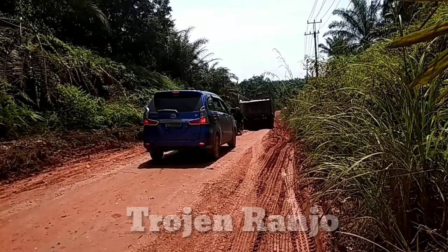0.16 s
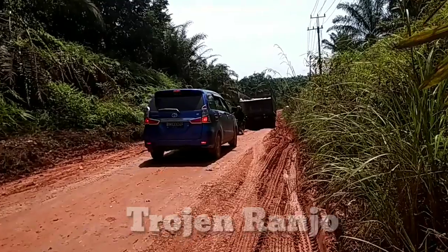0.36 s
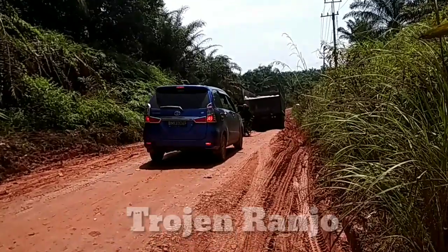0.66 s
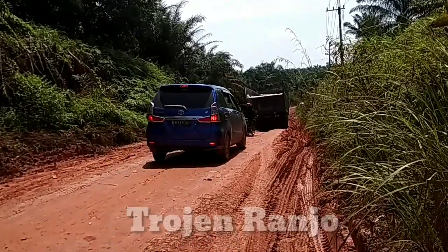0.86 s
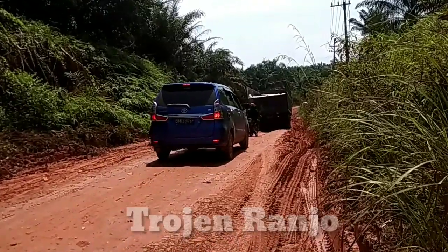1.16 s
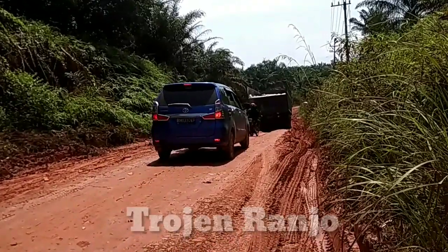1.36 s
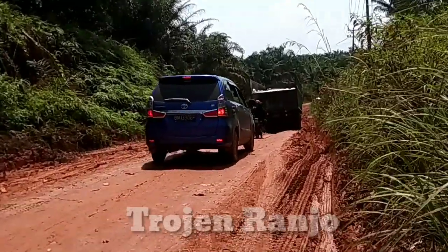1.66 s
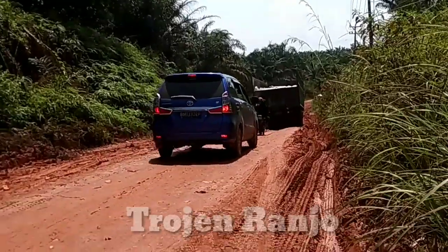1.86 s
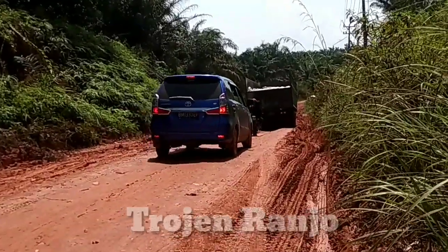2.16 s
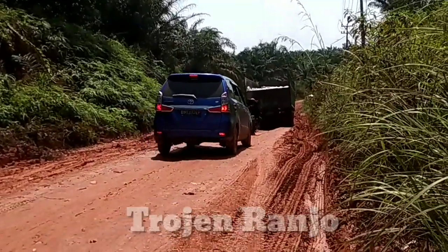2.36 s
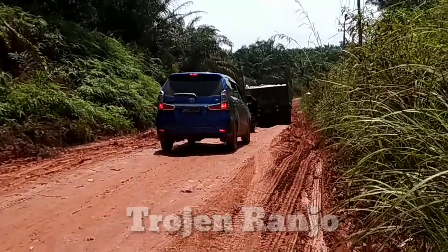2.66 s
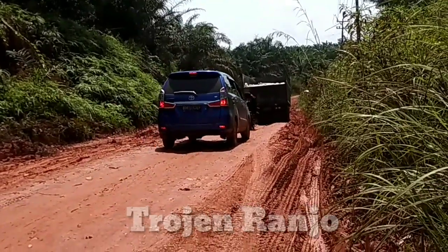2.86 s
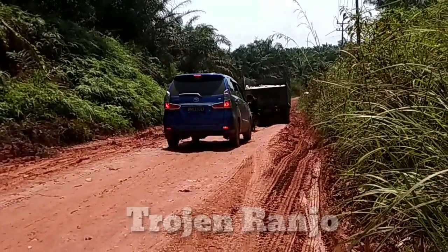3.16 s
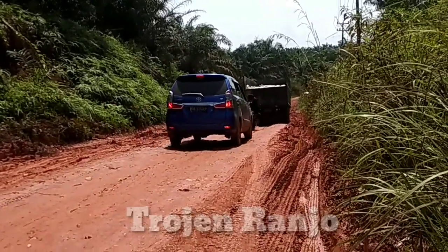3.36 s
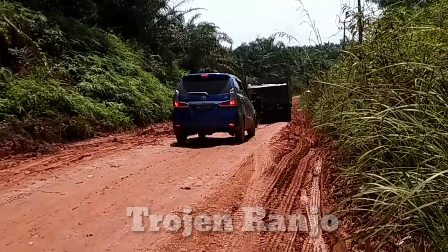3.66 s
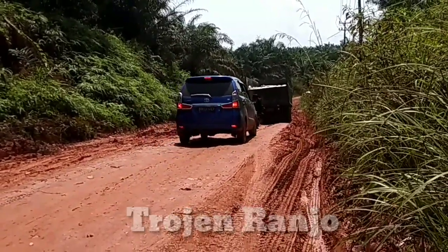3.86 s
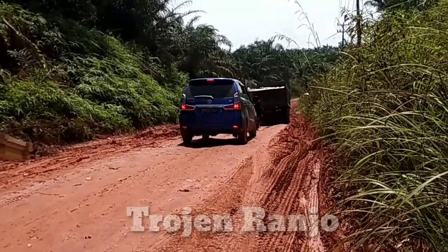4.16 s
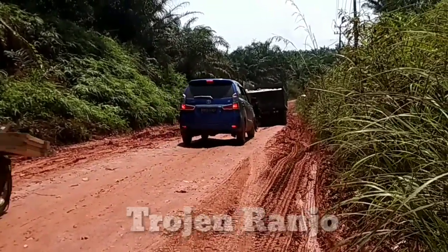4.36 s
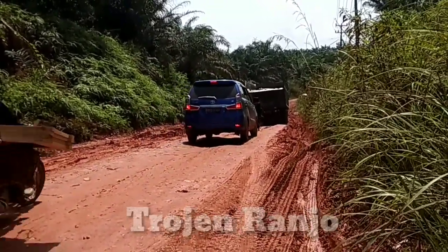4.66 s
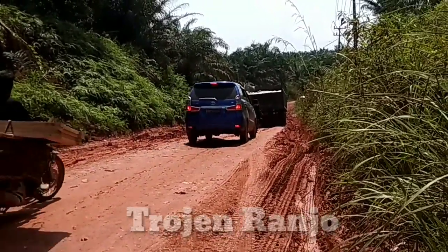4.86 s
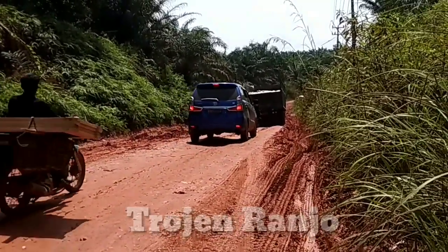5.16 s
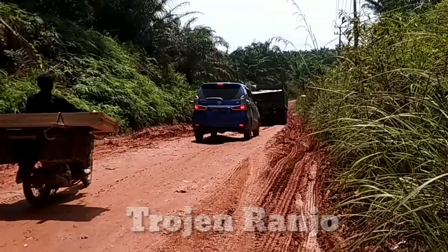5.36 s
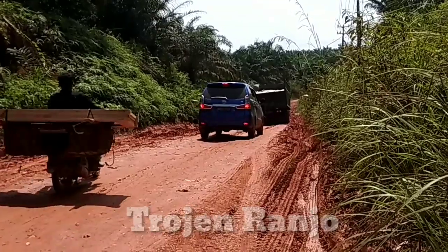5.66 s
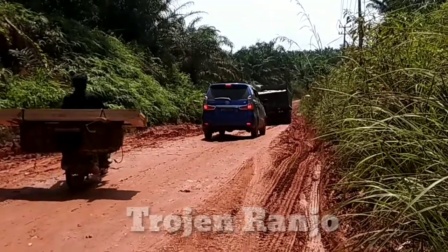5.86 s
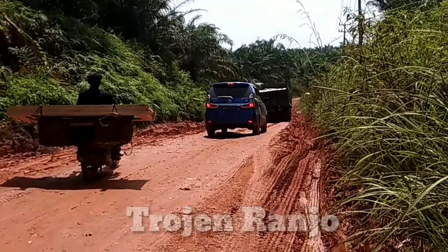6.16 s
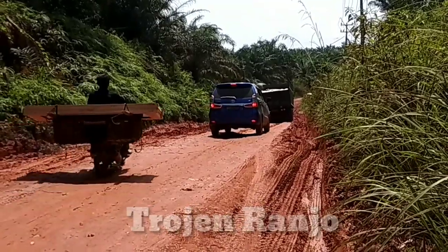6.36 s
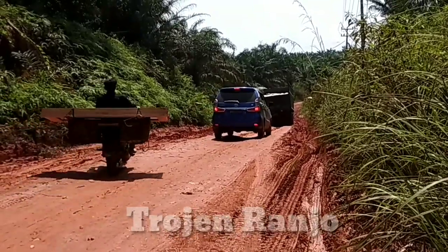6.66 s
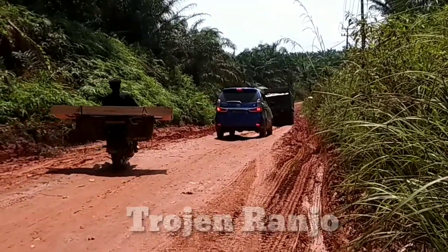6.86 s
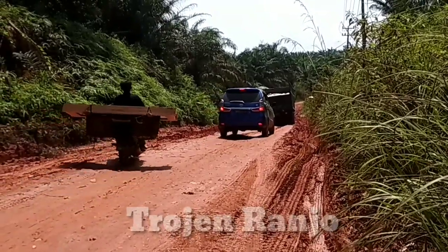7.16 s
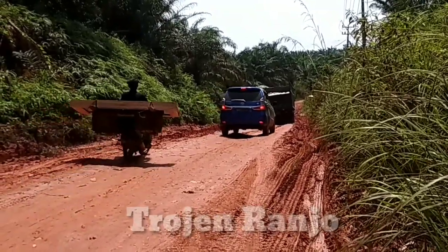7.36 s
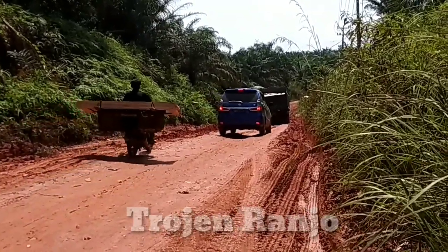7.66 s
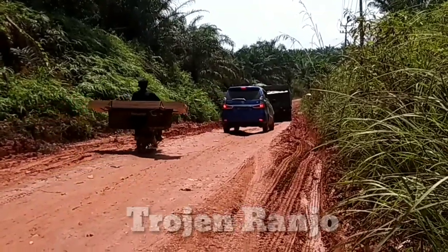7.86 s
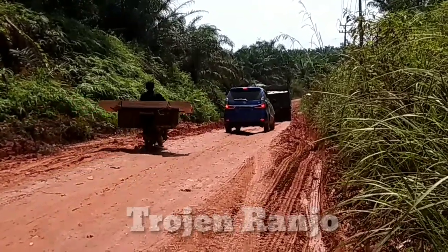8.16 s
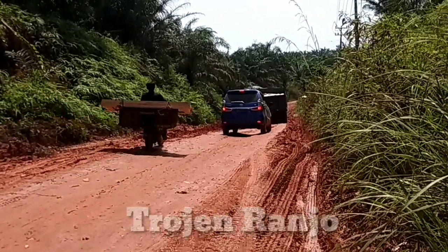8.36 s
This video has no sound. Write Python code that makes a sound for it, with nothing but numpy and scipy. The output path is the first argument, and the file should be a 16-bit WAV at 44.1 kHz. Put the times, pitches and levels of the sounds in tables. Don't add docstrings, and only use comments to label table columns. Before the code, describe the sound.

Open dirt road, heard from the roadside in stereo. From 0 s a loaded single-cylinder motorbike is already close at one side, its low uneven chug slowing from about 18 to 13 firings a second. Loose metal and boards jingle and clatter in irregular bursts, with tiny squeaks. The strongest jolt, at 1.6 s, adds a deep frame knock and sharp rattle. Revs rise slightly near 2.9 s, then one short throttle blip peaks at 4.0 s and drops in pitch as it shuts. A bracket rings around 4.3-5 s. From 4.4 s the bike moves toward the front and recedes, chain whirring near 5.5 s, putting slowly with thinner, softer rattles until 8.5 s. Throughout, a truck idles as a low steady hum near 48 Hz, with faint car hum and tyre rumble. Light wind thuds brush the right side at the start and around 7-8 s.

```python
import sys
import numpy as np
from scipy import signal
from scipy.fft import rfft, irfft, next_fast_len
from scipy.io import wavfile
from scipy.ndimage import uniform_filter1d, map_coordinates

SR = 44100
rng = np.random.default_rng(int(sys.argv[2]) if len(sys.argv) > 2 else 0)


def gain_from_db(level_db):
    decades = np.asarray(level_db, float) / 20
    return 10 ** decades


def unload_audio(sound):
    columns = np.transpose(np.atleast_2d(sound))
    steps = np.round(np.clip(columns, -1, 1) * 32767)
    wavfile.write(sys.argv[1], SR, steps.astype(np.int16))


N = 375291
IDLE_PER_S = 11.4

# time_s, firings_per_s
ENGINE_SPEED = [(0.0, 18.64), (0.191, 15.98), (0.903, 13.89), (1.064, 12.21), (1.324, 13.01),
                (1.444, 12.86), (1.848, 13.03), (2.609, 13.12), (2.842, 14.96), (2.942, 17.48),
                (3.225, 15.85), (3.831, 16.38), (4.045, 22.71), (4.27, 16.43), (4.731, 12.58),
                (6.048, 12.37), (7.326, 12.08), (8.52, 11.77)]
# time_s, left_port_lag_ms, side_shading_share [0-1]
BIKE_BEARING = [(0, 0.33, 0), (.75, 0.38, 0.33), (1.6, 0.45, 0.34), (2.5, 0.4, 0.96), (3.25, 0.29, 0.8),
                (4, 0.19, 0.51), (5, 0.15, 0.53), (6, 0.11, 0.55), (7, 0.1, 0.66), (8.51, 0.066, 0.55)]
# time_s, level_db
NEARNESS = [
    (0, -0.5),
    (1.5, 1.5),
    (2.9, 0.5),
    (4, -1),
    (4.4, -4),
    (5.6, -6.5),
    (7.4, -10),
    (8.51, -9.5),
]


def evened(x):
    return x / np.sqrt(np.mean(x ** 2) + 1e-20)


def curves(rows):
    s, *columns = np.transpose(rows)
    return [np.interp(np.arange(N) / SR, s, c) for c in columns]


def shaped(x, points, scale=gain_from_db):
    size = next_fast_len(N)
    hz, value = np.transpose(points)
    log_hz = np.log(np.fft.rfftfreq(size, 1 / SR) + 1)
    gain = scale(np.interp(log_hz, np.log(hz), value))
    return irfft(rfft(x, size) * gain, size)[..., :N]


def modes(x, table, wander_db=0.):
    out = 0
    for k, (hz, width_hz, db) in enumerate(table):
        level = gain_from_db(db + wander_db * drift(9)) if wander_db else gain_from_db(db)
        b, a = signal.iirpeak(hz, hz / width_hz, SR)
        out = out + (-1) ** k * level * signal.lfilter(b, a, x)
    return out


def gliding(x, hz, width_hz):
    turn = np.exp(2j * np.pi * np.cumsum(hz) / SR)
    r = np.exp(-np.pi * width_hz / SR)
    return 2 * (turn * signal.lfilter([1 - r], [1, -r], x / turn)).real


def drift(hz):
    knots = rng.standard_normal(int(N / SR * hz) + 3)
    coarse = np.arange(0, N + 64, 64)
    smooth = map_coordinates(knots, [coarse / SR * hz])
    return evened(np.interp(np.arange(N), coarse, smooth))


def grit(spread_db, size):
    clumps = np.repeat(rng.exponential(1, N // size + 1), size)[:N]
    return evened(rng.standard_normal((2, N)) * gain_from_db(spread_db * clumps))


def patchy(x, depth_db):
    z = signal.stft(x, nperseg=512, noverlap=384)[2]
    field = uniform_filter1d(rng.standard_normal(z.shape[1:]), size=3, axis=0)
    field = uniform_filter1d(field, size=20, axis=1)
    return signal.istft(z * gain_from_db(depth_db * evened(field)), nperseg=512, noverlap=384)[1][:, :N]


def exhaust():
    # time_s, thump_db
    throttle = [(0, -27), (.25, -30), (.6, -32), (1, -33.5), (1.3, -28), (1.6, -33.5), (2, -27),
                (3.2, -28.5), (3.5, -33.5), (3.62, -21), (3.83, -24), (3.95, -17.5), (4.1, -26),
                (4.55, -26), (4.75, -44.5), (5.4, -29.5), (6.3, -38), (8.52, -37)]
    # time_s, level_db (against an even one)
    kicks = [(.14, -3.5), (.386, 5), (.466, 0), (.596, 4.5), (.2, 4.5), (.8, 1), (1.029, -1), (1.182, 6),
             (1.8, 5), (1.875, 1.5), (1.955, -7), (2.34, 0.5), (2.42, -1.5), (2.49, -0.5), (2.712, -0.5),
             (2.795, -3), (2.86, -1), (2.92, 2.5), (3.09, 4), (3.15, -5), (3.276, 4), (3.34, -4),
             (3.467, 6), (3.654, 0), (4.24, -1.5), (4.495, -6), (4.565, -1), (5.03, 4), (5.13, -11),
             (5.195, 3), (5.51, -4), (5.68, -4), (5.92, -16), (6.16, 5.5), (6.24, -10), (6.57, 5),
             (6.65, -13), (6.735, 5.5), (6.895, 8), (6.98, -4), (7.135, -5), (7.305, 5.5), (7.39, -1),
             (7.48, 6.5), (7.56, -8), (7.64, 4), (7.8, 2), (7.89, -1), (7.975, 7.5), (8.06, -2), (8.145, 2),
             (8.225, -14), (8.395, -4), (8.475, 4)]
    # pitch_hz, width_hz, level_db
    pipe = [(197, 80, -17.5), (297, 17, -20.5), (324, 40, -20), (530, 40, -34)]
    uneven_db, push_ms, lead_ms, first_turn = 3.0, 3.57, 8.55, .47
    muffler_hz, shut_hz, shut_s, reopen_s = 113.5, 88, 4.02, 4.3
    upper_width_hz, boom_hz, boom_width_hz = 51.6, 61, 23.4
    coasting_per_s2 = -9
    per_s, near_db, t = curves(ENGINE_SPEED)[0], curves(NEARNESS)[0], np.arange(N) / SR

    shut = (t > shut_s) * np.clip(1 - ((t - shut_s) / (reopen_s - shut_s)) ** 3, 0, 1)
    upper_hz = muffler_hz + (shut_hz - muffler_hz) * shut
    pulling = uniform_filter1d(1. * (np.gradient(per_s) * SR > coasting_per_s2), size=3000)
    boom_db = 4 - 1.5 * pulling * (per_s - IDLE_PER_S) + 0.41 * near_db

    turns = first_turn + np.cumsum(per_s) / SR + per_s * lead_ms / 1000
    firing = turns.astype(int)
    fired = np.diff(np.floor(turns), prepend=0) > 0
    lean = np.clip((17 - per_s) / 4, .25, 1)
    firing_db = rng.uniform(-0.7, 1, 400) - 0.31 * (-1.) ** np.arange(400)
    kick_db = np.zeros(400)
    for s, db in kicks:
        kick_db[int(turns[round(s * SR)])] = db
    strength = gain_from_db(uneven_db * lean * firing_db[firing] + kick_db[firing])
    u = np.arange(2000) / SR * 1000 / push_ms
    push = signal.oaconvolve(fired * strength, u * np.exp(-u * u))[:N]

    upper = gliding(push, upper_hz, 1.36 * upper_width_hz)
    upper = gliding(upper, upper_hz, upper_width_hz)
    boom = modes(push, [(boom_hz, boom_width_hz, 0)])
    boom = modes(boom, [(boom_hz, 2 * boom_width_hz, 0)])
    push = evened(push)
    rung = evened(upper) + gain_from_db(boom_db) * evened(boom) + 0.24 * push + 8 * modes(push, pipe)
    return gain_from_db(curves(throttle)[0] - 7.5) * rung, turns % 1


def case_clatter(cycle):
    # pitch_hz, level_db_per_hz
    case = [(300, -13), (600, -2), (820, -8), (920, -8), (1000, 1.5), (1090, -4), (1550, -3.5), (2300, -7),
            (3500, -8), (8000, -26)]
    # time_s, level_db (against the clatter)
    chain = [
        (0, -10.5),
        (2.2, -13),
        (4.2, -12),
        (4.6, -7.5),
        (5.5, -3),
        (6.6, -13),
        (7, -17),
        (8.51, -12),
    ]
    per_s = curves(ENGINE_SPEED)[0]
    puffs = 1 + 0.065 * np.exp(-cycle / 0.19)
    shake = puffs * grit(1.0, size=64)
    whirr = evened(modes(shake, [(890, 48, 0.33), (990, 70, -0.33)], wander_db=1.5))
    level_db = -49.5 + curves(NEARNESS)[0] + 0.41 * (per_s - IDLE_PER_S)
    return gain_from_db(level_db) * (evened(shaped(shake, case)) + gain_from_db(curves(chain)[0]) * whirr)


def load():
    # start_s, peak_db, boards_share_db, hold_s, t60_s
    bumps = [(0.032, -39.5, -6, .01, 0.95), (0.173, -35.5, -11, .01, 1.3), (0.61, -37, -8, 0.044, 1.4),
             (0.713, -34.5, -0.5, .01, 0.72), (1.151, -30, -1, 0.038, 0.76),
             (1.612, -26.5, -6, 0.02, 0.095), (1.923, -34, -5, .005, 0.35), (2.002, -40, -9, 0.0088, 0.18),
             (2.102, -32.5, -6.5, 0.039, 0.24), (2.224, -45, -15, .005, .15),
             (2.585, -31.5, -5.5, 0.044, 0.74), (2.875, -36.5, -3, 0.034, 0.52),
             (3.049, -31.5, -8.5, 0.023, 0.59), (3.1723, -38, -10, 0.034, 0.36),
             (3.525, -41, 3, .005, 0.31), (3.839, -32, -2, 0.035, 0.45), (4.046, -36, -5, .005, 0.31),
             (4.118, -36, -0.5, 0.0052, 0.36), (4.462, -36.5, -7, 0.028, 0.27),
             (4.566, -34.5, -8.5, 0.066, 0.35), (4.726, -32, -14, 0.039, 0.5),
             (4.999, -41, -11, 0.028, 0.93), (5.217, -36, -6.5, 0.022, .25),
             (5.503, -36.5, -18, 0.012, 0.25), (5.854, -41, -4, 0.033, 0.52),
             (5.987, -39, -11, 0.054, 0.21), (6.447, -38, -19, 0.067, 0.49), (6.824, -42, -5, 0.0096, 0.14),
             (7.35, -40.5, -11, 0.071, 0.67), (7.994, -45.5, -4.5, 0.038, .5),
             (8.098, -39, -15, 0.068, 0.87), (8.222, -39, -11, .02, 0.35)]
    # middle_s, peak_db, boards_share_db, half_length_s
    sways = [(0.28, -39, 2, 0.16), (.45, -44, -12, 0.04), (0.663, -38.5, -6, 0.028),
             (1.081, -32, -3, 0.033), (1.508, -30.5, -1, 0.045), (1.708, -31.5, -3, 0.068),
             (1.91, -42, -8, 0.021), (2.414, -35.5, -18, 0.07), (2.677, -36.5, -3, 0.034),
             (2.84, -39.5, 0, 0.037), (2.97, -49, 5, 0.12), (3.661, -36, -0.5, 0.035),
             (3.943, -35.5, 3, 0.012), (4.355, -37, -21.5, 0.054), (5.355, -42.5, -3, 0.033),
             (6.198, -47, -2, 0.018), (6.32, -43, -11.5, 0.032), (6.739, -44, -5, 0.068),
             (6.894, -41, -5, 0.037), (7.117, -40.5, -9, 0.024), (7.39, -44, -6, 0.19),
             (7.904, -46, -7, 0.033), (8.064, -48, -8, 0.047)]
    # pitch_hz, level_db_per_hz
    jingle_spectrum = [(1470, -13.5), (2500, -6.5), (3400, -7.5), (4140, -3), (4790, -4.5), (5900, -6.5),
                       (6450, -6), (7020, -4.5), (7350, -4), (7930, -4.5), (9460, -4.5), (11300, -3.5),
                       (13500, -9.5), (15300, -15.5), (15600, -17)]
    # pitch_hz, width_hz, level_db
    metal_modes = [(1820, 53, -6), (4160, 34, -0.5), (5210, 30, -3.5), (5580, 34, -1), (6070, 21, -4),
                   (7510, 52, 2.5), (7515, 25, 3.5), (8700, 15, 2), (8950, 31, -5), (10560, 76, 2.5),
                   (11720, 67, -10), (11700, 65, -13)]
    # pitch_hz, width_hz, level_db
    board_modes = [(1985, 120, 0), (2303, 89, 2.5), (2533, 71, 3.5), (2940, 1030, -3.5)]
    # time_s, level_db (against the jingle)
    bracket = [
        (0, -51),
        (4.2, -11),
        (4.35, -7.5),
        (4.85, -7),
        (5.1, -14),
        (8.51, -25.5),
    ]
    bracket_modes = [(1820, 90, -12), (4200, 130, 4), (5620, 140, 2), (6270, 79, -7), (7300, 110, -1.0)]
    crest_db, ring_db, boards_db = -9.0, -8.5, -2.5
    still_db, still_boards_db, fade = -53, -8, 0.52
    hard_rise_s, rise_s_per_db = .003, .0003
    side_shine_db_per_ms = 11

    metal = gain_from_db(2 * (still_db + fade * curves(NEARNESS)[0]))
    wood = metal * gain_from_db(2 * still_boards_db)
    t = np.arange(N) / SR
    for s, db, share_db, half_s in sways:
        at = slice(max(round((s - 4 * half_s) * SR), 0), round((s + 4 * half_s) * SR))
        power = gain_from_db(2 * (db + crest_db)) * np.exp(-((t[at] - s) / half_s) ** 2)
        metal[at] += power
        wood[at] += gain_from_db(2 * (share_db + boards_db)) * power
    t = t[:SR]
    for s, db, share_db, hold_s, t60_s in bumps:
        rise_s = hard_rise_s + rise_s_per_db * max(-30 - db, 0)
        decay_db = 60 * np.maximum(t - rise_s - hold_s, 0) / t60_s
        power = gain_from_db(2 * (db + crest_db - decay_db)) * np.minimum(t / rise_s, 1) ** 2
        at = slice(round(s * SR), min(round(s * SR) + SR, N))
        power = power[:at.stop - at.start]
        metal[at] += power
        wood[at] += gain_from_db(2 * (share_db + boards_db)) * power

    flicker = gain_from_db(1.27 * drift(40))
    blows = grit(0.71, size=32)
    jingle = evened(shaped(blows, jingle_spectrum))
    jingle += gain_from_db(ring_db) * evened(modes(blows, metal_modes, wander_db=4.5))
    jingle += gain_from_db(curves(bracket)[0]) * evened(modes(blows, bracket_modes))
    shine_db = side_shine_db_per_ms * np.maximum(curves(BIKE_BEARING)[0] - .2, 0)
    jingle += (gain_from_db(shine_db) - 1) * shaped(jingle, [(6000, -13), (10000, 0)])
    boards = evened(modes(grit(0.88, size=128), board_modes, wander_db=1.5))
    return flicker * (np.sqrt(metal) * evened(jingle) + np.sqrt(wood) * boards)


def knocks():
    # start_s, peak_db, pitch_hz, t60_s, width_share (of pitch)
    blows = [(1.55, -36, 460, .05, .3), (1.563, -19, 77.5, 0.075, 0.2), (1.577, -30.5, 427, 0.059, 0.21),
             (1.578, -29, 890, 0.04, 0.22), (1.593, -38, 449, .05, .3), (3.593, -37, 860, .05, .6),
             (3.655, -36, 902, 0.055, .7), (1.577, -30, 1900, 0.022, 0.68), (1.562, -38, 260, 0.072, .5),
             (.657, -28, 12500, .015, .5), (2.0455, -25.5, 12000, .025, 0.63),
             (2.64, -27, 5070, 0.033, 0.74), (3.884, -31, 1183, 0.06, 0.84),
             (3.89, -40, 300.4, 0.114, 0.63), (3.938, -29, 1080, 0.094, 0.85),
             (3.941, -31.5, 2480, 0.048, 0.48), (5.721, -34, 10560, 0.02, 0.96),
             (5.733, -34.5, 9570, 0.021, 1)]
    struck, click = 0.52, 1.24
    size = 8000
    out, t = np.zeros((2, N + size)), np.arange(size) / SR
    for s, db, hz, t60_s, breadth in blows:
        drive = rng.standard_normal((2, size))
        drive[:, 30] += click / np.sqrt(np.pi * breadth * hz / SR)
        burst = evened(modes(drive, [(hz, breadth * hz, 0)]))
        burst += struck * max(1 / breadth - 1, 0) * np.sin(2 * np.pi * hz * t)
        attack = np.minimum(t / max(0.00079, 0.24 / hz), 1)
        out[:, round(s * SR):][:, :size] += burst * gain_from_db(db - 6 - 60 * t / t60_s) * attack
    return shaped(out[:, :N], [(14000, 0), (15500, -30)])


def squeaks():
    # start_s, length_s, from_hz, to_hz, level_db
    slips = [(0.029, 0.11, 5670, 4830, -49), (0.169, 0.03, 2750, 3600, -42),
             (0.182, 0.051, 3420, 3270, -42), (0.205, 0.05, 2700, 2460, -46.5),
             (0.598, 0.04, 4680, 4480, -46), (0.716, 0.034, 2500, 2650, -41.5),
             (1.009, 0.044, 4680, 4380, -45), (1.438, 0.025, 4800, 4200, -46),
             (1.466, 0.032, 4200, 4200, -43), (1.608, 0.046, 2064, 2420, -41),
             (2.213, 0.084, 4800, 4200, -50.5), (3.526, 0.058, 4144, 4070, -45.5),
             (3.845, 0.044, 3100, 1150, -49), (1.066, 0.037, 2500, 2490, -44),
             (1.163, 0.049, 2380, 2600, -47), (8.128, 0.027, 2937, 2850, -54),
             (8.22, .02, 2260, 2150, -52.5), (8.08, 0.045, 5474, 5770, -51),
             (8.232, 0.066, 4000, 4700, -56)]
    rough, second_db, third_db = 0.0174, -2.5, -8.
    out = np.zeros((2, N))
    for s, length_s, from_hz, to_hz, db in slips:
        size = round(length_s * SR)
        tremble = evened(uniform_filter1d(rng.standard_normal((2, 8000)), size=60))[:, :size]
        hz = np.linspace(from_hz, to_hz, size) * (1 + rough * tremble)
        turn = 2 * np.pi * np.cumsum(hz, axis=1) / SR
        tone = np.sin(turn)
        if from_hz > 4500:
            tone += gain_from_db(second_db) * np.sin(2 * turn) + gain_from_db(third_db) * np.sin(3 * turn)
        out[:, round(s * SR):][:, :size] += gain_from_db(db + 3.5) * tone * np.hanning(size)
    return out


def rings():
    # start_s, length_s, pitch_hz, level_db
    parts = [(.05, .05, 10240, -51), (0.626, .05, 2450, -48), (.63, .03, 5000, -52), (.72, .02, 12800, -48),
             (1.046, 0.059, 7520, -47), (1.048, 0.043, 11600, -45), (1.07, .035, 5050, -54),
             (1.153, .03, 10900, -44), (1.153, .025, 7500, -46), (1.165, .03, 9000, -48),
             (1.475, .05, 11000, -45), (1.613, 0.023, 2280, -44), (3.843, 0.03, 5780, -43.5),
             (3.845, .03, 2960, -45), (3.948, 0.19, 1550, -52), (4.297, .08, 5590, -57),
             (4.348, 0.047, 5990, -51), (4.465, .045, 5600, -55), (4.566, 0.067, 5810, -49),
             (4.573, 0.031, 1780, -53), (4.59, .04, 5070, -55), (4.726, .06, 7550, -47),
             (4.726, 0.071, 5580, -46.5), (4.73, 0.025, 1780, -51), (4.743, 0.11, 4050, -60),
             (4.835, 0.018, 5580, -52), (7.36, .07, 2570, -58), (7.36, .1, 7250, -56),
             (7.39, 0.067, 5300, -57), (7.88, 0.059, 2203, -59), (8.09, .03, 5400, -53),
             (8.1, .06, 4970, -55), (8.115, .035, 5720, -54), (8.12, .05, 8560, -56),
             (8.241, .03, 4580, -53)]
    width_hz = 67.0
    out = np.zeros((2, N))
    for s, length_s, hz, db in parts:
        size = round(length_s * SR)
        u = np.arange(size) / size
        tone = evened(modes(rng.standard_normal((2, 10000)), [(hz, width_hz, 0)]))[:, 1000:1000 + size]
        out[:, round(s * SR):][:, :size] += gain_from_db(db + 1) * tone * np.minimum(u / 0.071, 1) * (1 - u ** 2)
    return out


def ports(pair):
    # pitch_hz, left_minus_right_db
    shade = [(300, -8), (900, 8), (2200, 7), (3500, -3), (5000, -5.5), (9000, -2.5), (14000, 2)]
    # pitch_hz, likeness [0-1]
    same = [(100, 1), (400, 0.91), (1000, 0.73), (2400, 0.6), (5000, 0.24), (10000, 0.11)]
    lag_ms, shading = curves(BIKE_BEARING)
    direct, scattered = pair
    late = map_coordinates(direct, [np.arange(N) - lag_ms * SR / 1000], mode="nearest")
    left = shaped(late, same, lambda c: np.clip(c, 0, 1))
    left += shaped(scattered, same, lambda c: np.sqrt(1 - np.clip(c, 0, 1) ** 2))
    shaded_left = shaped(left, shade, lambda db: gain_from_db(db / 2))
    shaded_right = shaped(direct, shade, lambda db: gain_from_db(-db / 2))
    return shading * np.array([shaded_left, shaded_right]) + (1 - shading) * np.array([left, direct])


def tyre_rumble():
    # pitch_hz, level_db_per_hz
    spectrum = [(10, -33), (20, -26), (45, -7), (78, -9.5), (125, -12), (160, -17.5), (275, -25),
                (340, -26), (490, -32), (900, -35.5), (1100, -44), (1600, -52.5), (3000, -88)]
    a, b = shaped(grit(0.43, size=256), spectrum)
    level_db = -40 + 0.16 * curves(NEARNESS)[0] + 1.0 * drift(12)
    return gain_from_db(level_db) * evened(np.array([a + 0.15 * b, a - 0.17 * b]))


def truck():
    # time_s, firing_hz, level_db
    idle = [(0, 46.7, -37), (.2, 47.9, -41.5), (.45, 47.47, -39), (1, 47.77, -38), (2, 48.01, -38.5),
            (2.5, 48.17, -38.5), (2.85, 48.18, -32.5), (3.05, 48.53, -36), (3.3, 48.36, -33.5),
            (3.55, 49.72, -38), (4.6, 48.05, -40), (4.85, 48.15, -38), (5.4, 48.54, -34.5),
            (5.75, 48.06, -37), (5.95, 48.3, -41.5), (6.2, 47.96, -35.5), (7.15, 48.05, -37),
            (8.2, 49.1, -37.5), (8.51, 49.1, -36)]
    # multiple_of_firing, level_db
    engine_orders = [(.5, -18), (.75, -15), (1.25, -14), (2.5, -30), (3.25, -29), (4.2, -27), (4.75, -27),
                     (6.75, -30)]
    waver, swell_db = 0.0089, 0.5
    hz, db = curves(idle)
    turn = 2 * np.pi * np.cumsum(hz * (1 + waver * drift(6))) / SR
    tone = np.sin(turn)
    for multiple, order_db in engine_orders:
        tone += gain_from_db(order_db + 3.6 * drift(4.3)) * np.sin(multiple * turn + 6 * rng.random())
    return np.sqrt(2) * gain_from_db(db + swell_db * drift(5.6)) * tone


def car():
    # pitch_hz, width_hz, level_db
    panels = [(197.3, 9.4, 2), (231.4, 8, -3.5), (343.2, 11, -3), (525.4, 18, -9)]
    # time_s, hum_db, pitch_factor
    creep = [(0, -51.5, 0.96), (.35, -50.5, 1.), (1, -54, .99), (2, -52.5, 0.99), (3.5, -55, 0.99),
             (4.5, -55, 1.), (5.3, -51, 1.), (5.9, -52, 1.01), (6.5, -57.5, 1.02), (8.51, -56.5, 1)]
    level_db, pitch = curves(creep)
    drive = rng.standard_normal(N)
    hum = sum(gain_from_db(db) * evened(gliding(drive, hz * pitch, width_hz)) for hz, width_hz, db in panels)
    return gain_from_db(level_db) * evened(hum)


def breeze():
    # time_s, level_db
    gusts = [(0, -34), (.3, -44), (6.9, -57), (7.1, -35), (7.3, -41.5), (7.72, -40), (7.8, -32),
             (7.88, -37), (8.15, -39.5), (8.51, -41)]
    left_db = -22.0
    spectrum = [(3, -20), (12, 0), (30, -5), (70, -16), (150, -40), (500, -95)]
    lumps = shaped(rng.standard_normal((2, N)), spectrum)
    return gain_from_db(curves(gusts)[0] + [[left_db], [0]]) * evened(lumps)


def microphone_hiss():
    # pitch_hz, level_db_per_hz
    spectrum = [(2000, -30), (10000, -10), (13000, 0), (15350, -2), (15550, -20)]
    return gain_from_db(-81) * evened(shaped(rng.standard_normal((2, N)), spectrum))


def scene():
    thumps, cycle = exhaust()
    lag_ms = 0.58 * curves(BIKE_BEARING)[0]
    late = map_coordinates(thumps, [np.arange(N) - lag_ms * SR / 1000], order=1, mode="nearest")
    bike = patchy(case_clatter(cycle) + load(), depth_db=2.5) + knocks() + squeaks() + rings()
    around = truck() + car() + tyre_rumble() + breeze() + microphone_hiss()
    return np.array([late, thumps]) + around + ports(bike)


def band_limit(x):
    return signal.sosfilt(signal.butter(12, 15680, fs=SR, output="sos"), x)


def record(dry):
    # from_hz, muted_share [0-1]
    top_bands = [(14470, .25), (15160, .78)]
    edge_hz, mute_db, bins_per_hz = 15680, -22, 1024 / SR
    mid_side = np.array([dry[0] + dry[1], dry[0] - dry[1]]) / 2
    z = signal.stft(mid_side, nperseg=1024, noverlap=512)[2]
    power = uniform_filter1d(abs(z) ** 2, size=3, axis=2)
    power = uniform_filter1d(power, size=3, axis=1)
    near_db = 10 * np.log10(power + 1e-20)
    wide_db = uniform_filter1d(near_db, size=36, axis=1)
    below_db = np.interp(np.arange(513) * SR / 1024, [900, 1200, 2800, 11000, 13500], [30, 5.2, 2.7, 2.2, -.5])
    sunk = np.clip(wide_db - near_db - below_db[:, None], 0, 1)
    for hz, share in top_bands:
        first = round(hz * bins_per_hz)
        band = slice(first, first + 16)
        level = near_db[:, band].mean(axis=(0, 1))
        level = level - uniform_filter1d(level, size=60)
        sunk[:, band, level < np.quantile(level, share)] = 2
    sunk[:, round(edge_hz * bins_per_hz) - 3:] = 5
    mid, side = signal.istft(z * gain_from_db(mute_db * sunk), nperseg=1024, noverlap=512)[1][:, :N]
    return band_limit(np.array([mid + side, mid - side]))


dry = scene()
out = record(dry)
unload_audio(out)
```